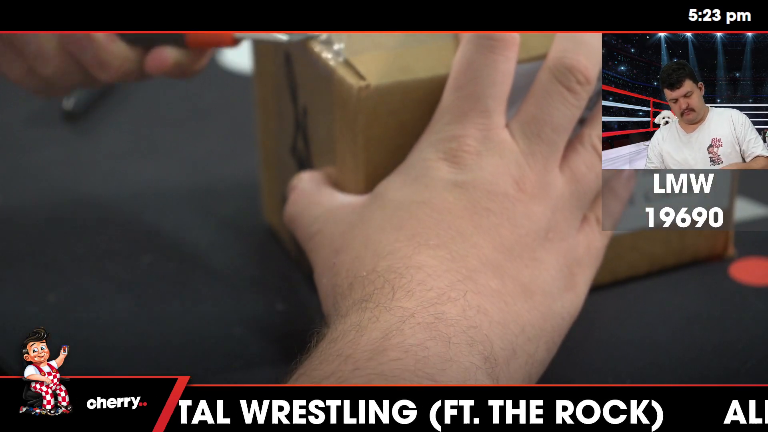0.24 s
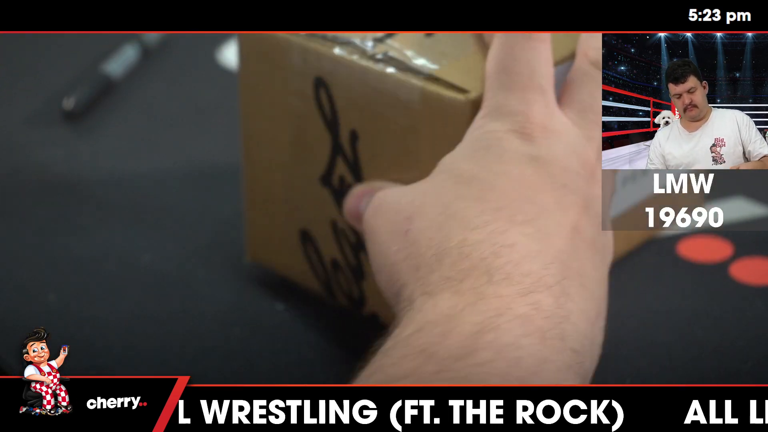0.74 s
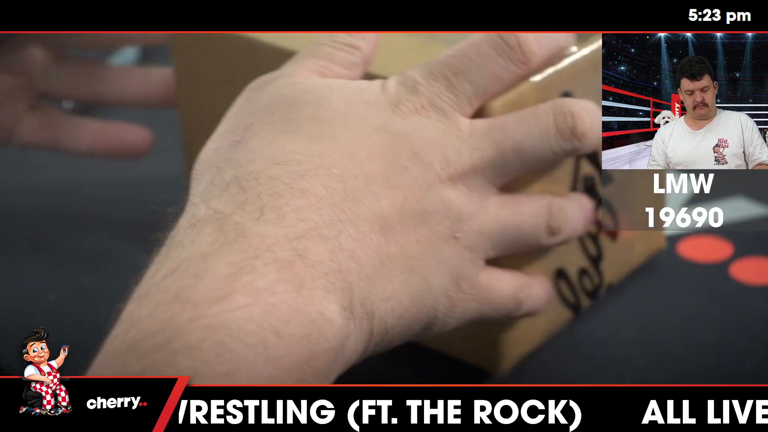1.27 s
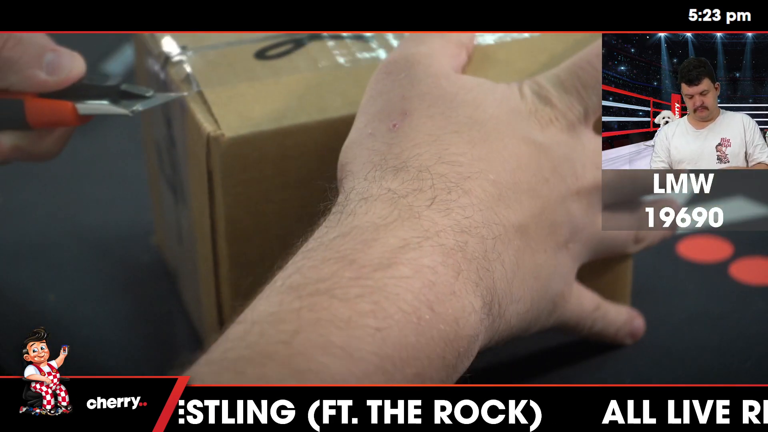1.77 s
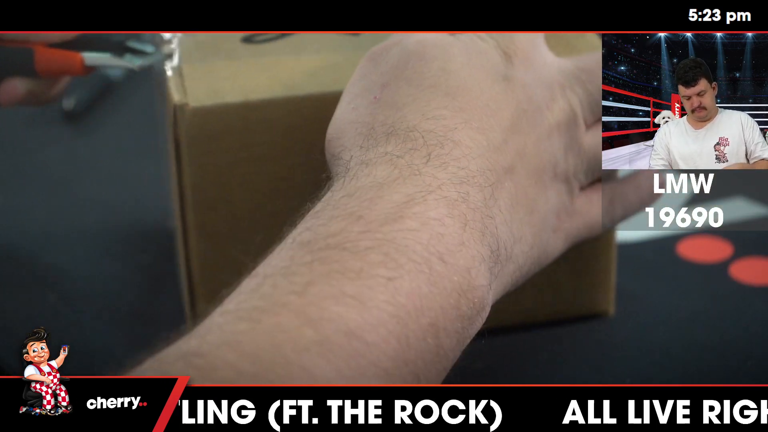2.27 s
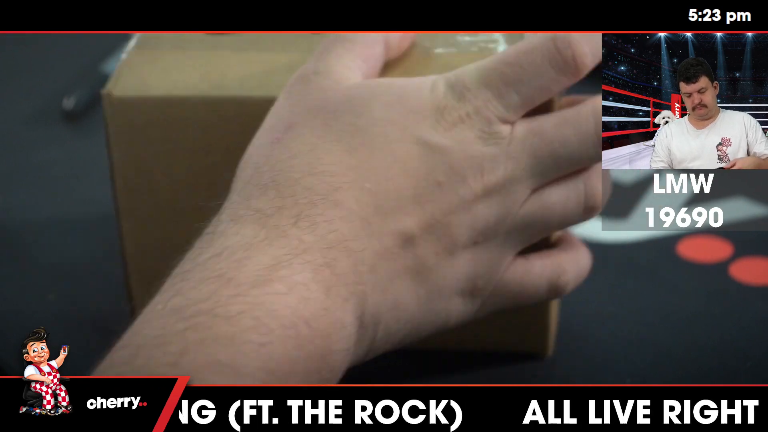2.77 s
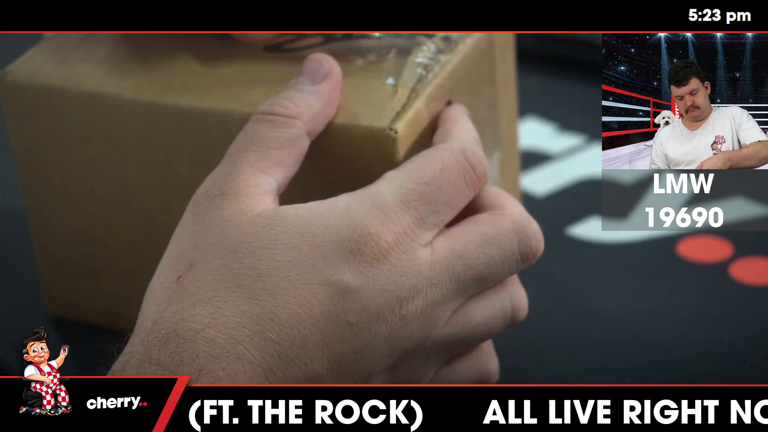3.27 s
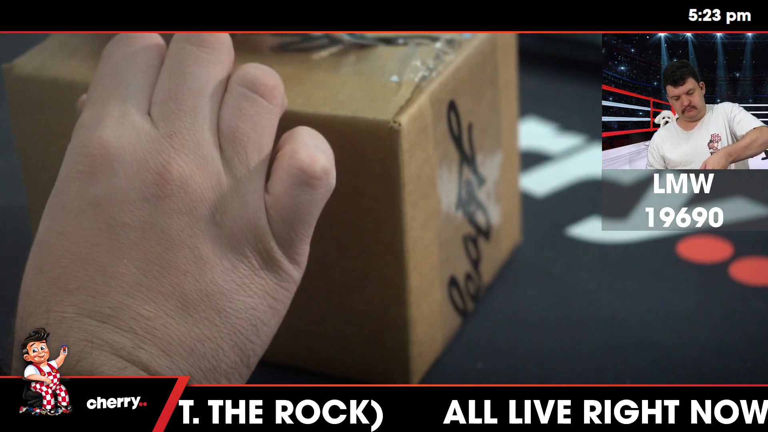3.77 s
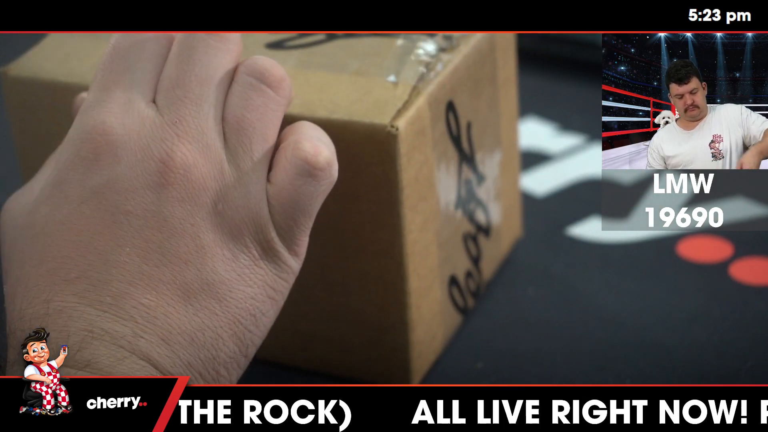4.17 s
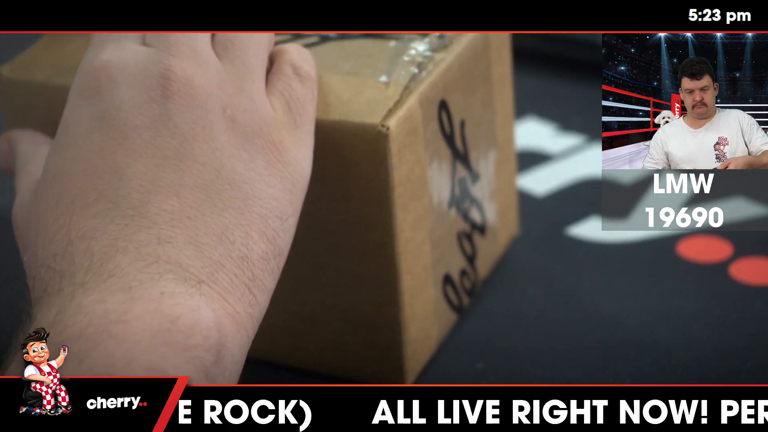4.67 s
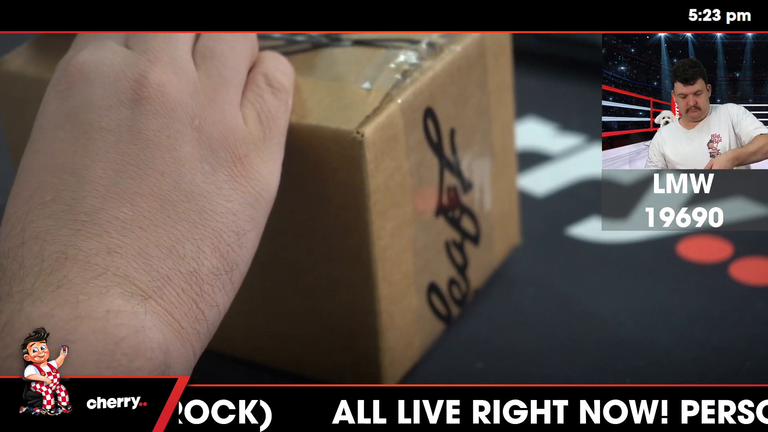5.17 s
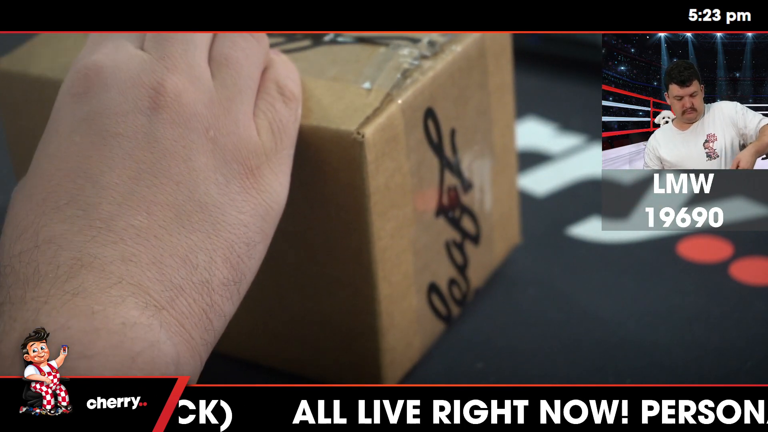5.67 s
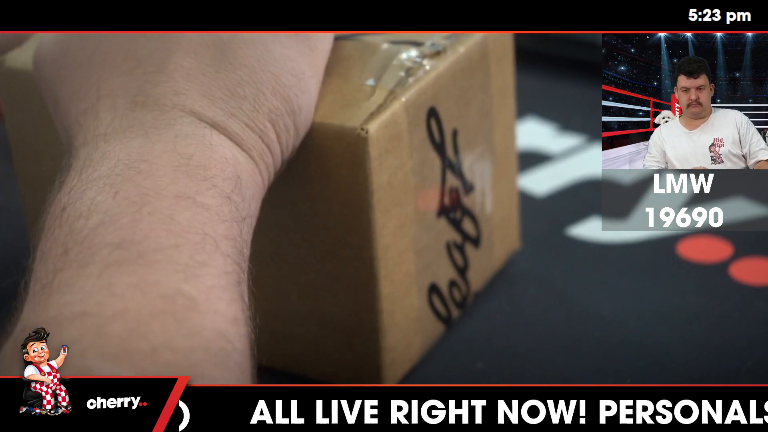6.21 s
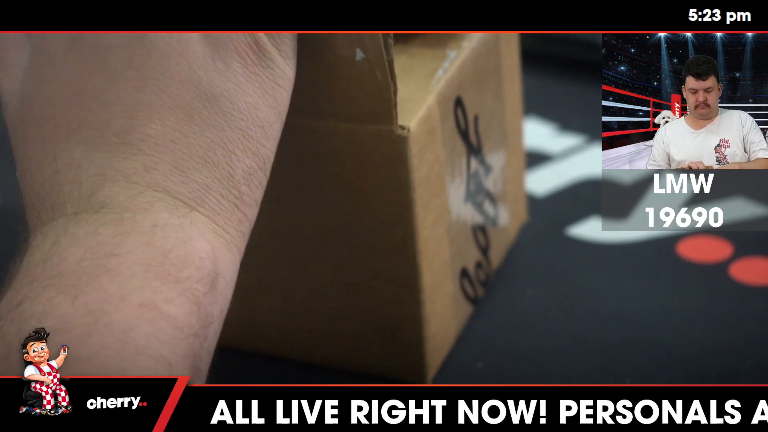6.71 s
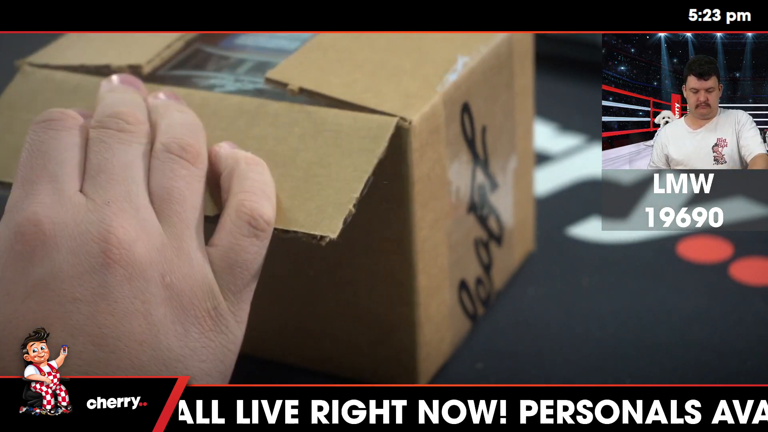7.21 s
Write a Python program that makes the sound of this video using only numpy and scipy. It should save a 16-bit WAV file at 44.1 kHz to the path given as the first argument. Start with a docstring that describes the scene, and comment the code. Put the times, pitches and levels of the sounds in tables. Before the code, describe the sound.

A soft low fan whir runs under close, mono handling sounds in a small room. At 0.1-0.2 s small snaps lead into a gritty blade rasp, brightest and slightly ringing at 0.3-0.5 s, then a crisp snap at 0.65. From 0.6 to 1.6 the box is turned: papery slides, ticks, crackles. Light clicks and rubbing around 2 s build to a short scratchy cut with sharp snaps at 2.3-2.4. Soft hissing slides fill 2.6-3.2. Hard snaps crack at 3.8 and 4.2 with hollow rumble, then it grows quiet, the whir sinking near 5. A strong snap at 5.3 brings short dull rasps to 5.7. Snaps at 5.9 lead to the loudest, bright crack at 6.2 and a cluster of pops and hollow thumps until 6.5. From 6.6 to the end, about 7.4, cardboard flaps rub, scrape and pop open.

```python
"""A utility knife slits the tape of a cardboard box on a cloth mat, close to a mono microphone in a small room.
A soft whir of fans runs throughout, sinking briefly near 5 s. First the blade rasps through in tiny tears, made
of random impulses, and the taut tape snaps in short noise bursts; unsteady pitched rings come with many snaps.
Between cuts the box is turned and hands slide over it: hissing noise with crackles. At the end the flaps are
pulled open, rubbing and popping. The hollow box rumbles under the hands."""
import sys
import numpy as np
from scipy import signal
from scipy.fft import rfft, irfft, next_fast_len
from scipy.io import wavfile
from scipy.ndimage import map_coordinates

SR = 44100
rng = np.random.default_rng(int(sys.argv[2]) if len(sys.argv) > 2 else 0)


def master_out(mix):
    """Clip the mix to full scale and print it as 16-bit PCM to the path in sys.argv[1]."""
    frames = np.transpose(np.atleast_2d(mix))
    ceiling = np.clip(frames, -1, 1)
    pcm = np.round(ceiling * 32767).astype(np.int16)
    wavfile.write(sys.argv[1], SR, pcm)


N = 328545

# The whir of the room. Each row: time in seconds, level in dB.
WHIR_LEVEL = [(0, -58), (.2, -58), (1.6, -60), (3.3, -58), (4.3, -64.5), (4.75, -64), (4.88, -73),
              (5.12, -72.5), (5.2, -57), (5.85, -63.5), (6.2, -61.5), (7.45, -57)]
# Colour of the whir. Each row: frequency in Hz, strength in dB.
WHIR_SPECTRUM = [(25, -20), (70, -6), (130, -1.5), (185, 4), (330, -1.5), (450, -3.5), (700, 1),
                 (1000, -2.5), (1400, -1), (1900, -15), (3000, -14), (7000, -17), (15000, -27)]
# Snaps of tape, blade and board. Each row: start in seconds, level in dB, brightness in dB per octave,
# level of the panel's knock in dB, decay time (to -60 dB) in seconds, before the extra of each band.
SNAPS = [(0.083, -45.5, -5, -51, 0.0057), (.144, -31, 3.5, -42.5, 0.01), (0.1602, -37.5, 12, -64, .01),
         (0.1984, -33.5, 0.5, -36.5, 0.011), (0.2044, -37, 2, -57, 0.0043), (0.5581, -41, -5, -58, .007),
         (0.654, -25.5, 9, -45, 0.013), (0.8785, -34, -4.5, -46, 0.0079), (1.0289, -42.5, -6.4, -45, 0.016),
         (1.1406, -43.5, 7, -55, 0.017), (1.1752, -38, -1, -51, 0.0087), (1.337, -37, 7, -55, 0.0062),
         (1.69, -56, -12.5, -49, .008), (1.873, -47, -1, -55, .015), (1.9138, -43, -0.5, -46, 0.0011),
         (1.9901, -40, 2.5, -50, 0.005), (2.0188, -41, -6.5, -44, .0034), (2.1136, -37, 2, -50, 0.0092),
         (2.1782, -37, 7, -42, 0.005), (2.197, -36.5, 7.5, -45, 0.003), (2.3143, -26, 2, -36.5, 0.0053),
         (2.3247, -36, 11, -58, 0.0037), (2.3812, -29.5, -2.5, -50, 0.0044), (4.5558, -49.5, 0, -55, .009),
         (5.1415, -59, 0, -61, 0.0077), (2.6366, -36, 0.5, -54, 0.0035), (3.1739, -57, -9, -50, .011),
         (3.5475, -46, 4.5, -51, 0.004), (3.622, -45.5, 9.5, -46, 0.042), (3.7308, -44.5, -0.5, -48, .014),
         (3.7739, -21.5, -0.2, -29.5, .007), (3.789, -36, 15, -63, .022), (4.176, -27.5, 0, -38, 0.015),
         (4.1832, -20.5, 7, -36, 0.0068), (4.784, -53, 3, -60, .012), (5.1772, -38, 3.5, -49, 0.022),
         (5.2907, -20, -1.4, -28, 0.013), (5.716, -30, 4, -55, 0.028), (5.8984, -42.5, 4, -59, 0.058),
         (5.937, -27.5, 6.5, -44, 0.012), (6.0773, -47, 11.5, -65, 0.0091),
         (6.1083, -41.5, -8.5, -39.5, 0.013), (6.148, -36.5, -5.5, -44, .006),
         (6.173, -38, -7, -44, 0.0054), (6.1847, -43.5, -11.5, -29.5, .011),
         (6.19, -15.5, 8.5, -31.5, 0.026), (6.2325, -34.5, 11.5, -61, .017),
         (6.2661, -26.5, 7, -47, 0.0083), (6.2756, -34.5, 1, -50, 0.012), (6.3359, -26.5, -0.7, -29, .014),
         (6.4091, -42, 7, -38.5, .009), (6.4865, -34.5, 1, -49, 0.012), (6.6693, -38.5, -6.5, -35, 0.018),
         (6.7772, -38.5, 0, -61, 0.025), (6.956, -36, 2, -65, 0.0063), (6.988, -37, -1.5, -43.5, 0.0041),
         (7.147, -31, 1, -47, .005), (7.195, -36.5, 7.5, -60, 0.0092), (7.2253, -30.5, 4, -48, 0.054),
         (7.231, -29.5, 5.5, -56, .02), (7.4295, -34.5, 2, -42, 0.023)]
# Pop, crack, tick and fizz of a snap. Each row: low edge in Hz, high edge in Hz, extra decay time in seconds,
# level in dB.
SNAP_BANDS = [(840, 2590, .0038, -8), (3000, 7380, 0.0021, 0), (6800, 11100, .0015, -11),
              (12000, 15000, .001, -28)]
# The panel's knock under a snap: low edge in Hz, high edge in Hz, extra decay time in seconds.
KNOCK_BAND = (117, 503, 0.033)
# A seam that faces away from the microphone sends more of its snap into the room.
# Each row: time in seconds, level of the room's answer in dB.
SEAM_FACING = [(.1, -9), (.65, -8.5), (2.3, -7), (3.77, -6), (4.18, -6.5), (5.29, -8.5), (5.94, -8),
               (6.2, -17), (6.34, -3), (7.2, -10)]
# How long the room rings. Each row: frequency in Hz, decay time (to -60 dB) in seconds.
ROOM_DECAY = [(150, 1), (400, 1), (1000, 0.51), (3000, 0.64), (7000, 0.24), (14000, 0.35)]
# Pushes of the hands on the hollow box. Each row: start in seconds, length in seconds, level in dB,
# hardest moment as a share of the length.
PUSHES = [(.14, 0.31, -52, 1), (1.24, 0.11, -55.5, .4), (2.315, 0.14, -44.5, 0.11), (3.6, 0.042, -53.5, .5),
          (3.83, 0.54, -53, 0.48), (4.53, 0.21, -60.5, 0.23), (5.57, 0.21, -56, .75),
          (6.11, 0.22, -46.5, 0.2), (6.335, 0.24, -48.5, 0.075), (6.67, 0.049, -58, 0.29),
          (6.95, 0.34, -58.5, 0.62)]
# Colour of the hollow box's rumble. Each row: frequency in Hz, strength in dB.
BOX_SPECTRUM = [(25, -20.5), (70, -9.5), (130, -0.5), (185, 3.5), (300, -0.5), (450, -10), (700, -6.5),
                (1400, -9.5), (3000, -22), (6000, -59)]
# Pulls of the blade through tape and board. Each row: start in seconds, length in seconds, level in dB,
# hardest moment as a share of the length, brightness in dB.
CUTS = [(.148, 0.048, -42.5, 0.27, -1.5), (.2, 0.092, -45.5, .9, 0), (.288, 0.036, -39.5, 0.31, 2),
        (.343, 0.058, -35, .7, 1.5), (.408, 0.074, -35.5, 0.22, 0.5), (2.15, .05, -43.5, .3, -5),
        (2.316, .11, -38.5, 0.43, 2), (2.345, 0.016, -34.5, 0.62, 0), (3.788, 0.073, -42.5, .2, -3),
        (3.88, 0.3, -57, .2, -3), (5.303, 0.09, -43.5, 0.074, -6.5), (5.563, 0.1, -44.5, .35, -6),
        (5.65, 0.067, -41, 0.97, 0.5), (5.92, 0.048, -51, 0.41, -3), (6.11, 0.26, -52.5, 0.23, -8)]
# Resonances of the blade. Each row: frequency in Hz, width in Hz, level in dB.
BLADE_MODES = [(900, 350, -1.5), (2450, 160, 3), (3950, 200, -11), (6070, 350, -1), (7490, 250, -7),
               (10150, 450, -4)]
# How freely the blade rings, most in the middle of the first cut. Each row: time in seconds, ring in dB.
BLADE_RING = [(.31, -0.5), (.37, 6.5), (.48, 4), (2.2, -18)]
# Colour of the rasp and the crackles. Each row: frequency in Hz, strength in dB.
RASP_SPECTRUM = [(120, -18), (250, -6), (480, -9.5), (900, -5.5), (1300, -8.5), (1750, -7.5), (2900, -6.5),
                 (4300, -2), (6000, -3), (8000, -6), (10400, -9.5), (13000, -17), (16000, -27)]
# Cardboard sliding on the mat, under the hands, flap on flap. Each row: start in seconds, length in seconds,
# level in dB, fastest moment as a share of the length, treble in dB.
SLIDES = [(.56, 0.38, -48.5, 0.46, 1), (.89, 0.062, -41, 0.99, 3.5), (1.145, 0.068, -46.5, 0.93, 6),
          (1.24, 0.052, -49.5, 0.37, 9.5), (1.303, 0.038, -42.5, 0.7, 1), (1.35, 0.19, -53, .1, -3),
          (1.57, .21, -53.5, .3, -4), (2.0, 0.36, -47, 0.59, -11), (2.585, .09, -53.5, 0.13, 4.5),
          (2.68, 0.45, -47, 0.17, 5), (3.3, 0.21, -57, 0.63, -8.5), (3.64, .16, -61, .5, 3.5),
          (4.06, 0.34, -58, .25, 4), (4.555, 0.09, -57, 0.84, 1), (4.71, 0.041, -64.5, .4, 5.5),
          (4.85, 0.15, -70.5, 0.35, 2), (5.185, .08, -53.5, 0.15, -6), (5.37, 0.16, -47.5, 0.47, 3),
          (5.87, 0.36, -54, 0.17, -13), (6.34, 0.13, -47.5, 0.13, -1), (6.62, 0.36, -46, 0.44, -4.5),
          (6.93, 0.16, -45.5, 0.17, -5), (7.05, 0.195, -45, 0.78, -5), (7.125, 0.073, -42.5, 0.53, -6.5),
          (7.26, 0.26, -47, 0.66, 0.5)]
# Colour of the sliding hiss. Each row: frequency in Hz, strength in dB.
HISS_SPECTRUM = [(200, -33), (900, -13.5), (1900, -10.5), (2700, -7), (3800, 0), (5600, 1), (8000, -1),
                 (11000, -6.5), (15500, -17)]
# Pitched twangs and rings, mostly with the snaps: most very short, a few lingering like the room's answer.
# Each row: start in seconds, pitch in Hz, level in dB, decay time (to -60 dB) in seconds,
# pitch unsteadiness as a share.
TWANGS = [(0.656, 7040, -18, 0.015, 0.1), (2.018, 2520, -22, 0.0096, 0.1), (2.337, 270, -32, .044, 0.027),
          (3.627, 170, -47, 0.085, .03), (3.7733, 6430, -13.5, 0.01, 0.098),
          (3.775, 1920, -17, 0.01, 0.059), (4.184, 3060, -37.5, 0.4, 0.0536),
          (4.184, 4080, -37, 0.31, 0.058), (4.184, 6030, -14, 0.013, .033),
          (5.2927, 1800, -15, .0095, 0.16), (5.585, 500, -46.5, 0.26, .14),
          (5.938, 2600, -23, 0.017, 0.088), (6.195, 6955, -21.5, 0.062, .007),
          (6.196, 3320, -39.5, 0.66, 0.09), (6.485, 850, -26, 0.017, .03),
          (6.775, 4380, -29.5, .022, 0.056), (6.989, 1586, -23.5, 0.019, 0.045),
          (7.154, 149, -33, .071, .03)]
# Shape of each kind of stroke: swell from ends to crest in dB, attack in seconds, release in seconds.
PUSH_SHAPE = (9.6, 0.0055, 0.13)
CUT_SHAPE = (6.2, 0.0014, 0.12)
SLIDE_SHAPE = (7.9, 0.0029, 0.22)

SNAP_ATTACK_S = .0007
SNAP_PIVOT_HZ = 4690  # brightness tips a snap about this frequency
SHAKE_DB = -20.5  # rumble that any sliding shakes out of the box, relative to the sliding strength
# Crackles of handled board: how many a second, and level over the sliding strength
CRACKLE_RATE, CRACKLE_DB = 16, 3.5
CRACKLE_SCATTER_DB, CRACKLE_T60_S = 4, .008
TOP_HZ = 16100  # nothing is heard above this


def amp(db):
    """Turn dB into a plain multiplier."""
    return 10 ** (np.asarray(db) / 20)


def unit(x):
    """Scale a sound to an average (rms) strength of 1."""
    return x / np.sqrt(np.mean(x ** 2) + 1e-20)


def along(points, hz):
    """Read a curve of (Hz, value) points on a log frequency axis."""
    f, v = np.transpose(points)
    return np.interp(np.log(hz + 1), np.log(f + 1), v)


def curves(rows):
    """One value per sample for each column after the time."""
    s, *columns = np.transpose(rows)
    return [np.interp(np.arange(N) / SR, s, column) for column in columns]


def wobble(rate):
    """A smooth random curve through the given number of random points a second."""
    points = rng.standard_normal(int(N * rate / SR) + 4)
    return map_coordinates(points, [np.arange(N) * rate / SR])


def filtered(x, response):
    """Multiply each frequency of x by a (possibly complex) response."""
    m = next_fast_len(N + SR // 2)
    spectrum = rfft(x, m) * response(np.fft.rfftfreq(m, 1 / SR))
    return irfft(spectrum, m)[..., :N]


def coloured(x, spectrum):
    """Shape x by a spectrum table and scale it to rms 1."""
    return unit(filtered(x, lambda hz: amp(along(spectrum, hz))))


def add(track, s, sound):
    """Mix a sound into the track at time s."""
    start = max(0, round(s * SR))
    track[start:start + len(sound)] += sound[:max(0, N - start)]


def grains(rate, spread_db):
    """Fibres letting go at random moments: mostly small impulses, a few large."""
    size = amp(spread_db * np.minimum(rng.standard_normal(N), 2))
    happens = rng.random(N) < rate / SR
    return unit(happens * size * np.sign(rng.standard_normal(N)))


def puff(envelope, lo, hi):
    """A band of noise under an envelope, with the energy of 2 ms at rms 1."""
    band_pass = signal.butter(3, [lo, hi], "band", fs=SR, output="sos")
    band = signal.sosfilt(band_pass, rng.standard_normal(len(envelope)) * envelope)
    return band / np.sqrt(np.sum(band ** 2) / (.002 * SR))


def strokes(rows, shape):
    """Strength of hand strokes: each takes hold, swells to its crest, eases off and lets go."""
    swell_db, attack_s, release_s = shape
    gain = np.zeros(N)
    for s, length, db, crest, *_ in rows:
        t = np.arange(round((length + 2 * release_s) * SR)) / SR
        crest_s = length * np.clip(crest, .05, .95)
        off_crest = np.interp(t, [0, crest_s, length], [1, 0, 1])
        take_hold = 1 - np.exp(-t / attack_s)
        let_go = amp(-60 * np.maximum(t - length, 0) / release_s)
        add(gain, s, amp(db - swell_db * off_crest ** 2) * take_hold * let_go)
    return gain


def colour_of(rows):
    """The last column of a stroke table, gliding from one stroke to the next."""
    return curves([(s + length / 2, colour) for s, length, _, _, colour in rows])[0]


def whir():
    """Fans in the room: a soft noise, mostly below 1.5 kHz."""
    level_db, = curves(WHIR_LEVEL)
    return amp(level_db) * coloured(rng.standard_normal(N), WHIR_SPECTRUM)


def snaps(wall_db):
    """Each snap is a burst of a few milliseconds; its low part lingers in the panels, and the room answers."""
    direct, answer = np.zeros(N), np.zeros(N)
    t = np.arange(SR * 3 // 4) / SR
    for s, level_db, brightness, knock_db, t60 in SNAPS:
        answer_db = np.interp(s, *np.transpose(SEAM_FACING))
        parts = [(*KNOCK_BAND, knock_db)]
        for lo, hi, linger, band_db in SNAP_BANDS:
            octaves = np.log2(np.sqrt(lo * hi) / SNAP_PIVOT_HZ)
            parts.append((lo, hi, linger, level_db + band_db + brightness * octaves))
        for lo, hi, linger, db in parts:
            burst = amp(-60 * t / (t60 + linger)) * (1 - np.exp(-t / SNAP_ATTACK_S))
            room_t60 = along(ROOM_DECAY, np.sqrt(lo * hi))
            tail = amp(-60 * t / room_t60) * (1 - np.exp(-t / 0.0068))
            add(direct, s, amp(db) * puff(burst, lo, hi))
            add(answer, s, amp(db + answer_db) * puff(tail, lo, hi))
    # one near wall echoes 15.5 ms later
    wall = filtered(direct, lambda hz: np.exp(-2j * np.pi * hz * .0155))
    return direct + answer + amp(wall_db) * wall


def box(slide):
    """The walls and the air inside rumble as the hands push and drag."""
    force = np.hypot(strokes(PUSHES, PUSH_SHAPE), amp(SHAKE_DB) * slide)
    rumble = coloured(grains(rate=1500, spread_db=2.5), BOX_SPECTRUM)
    return force * amp(3.07 * wobble(30)) * rumble


def room(x, stretch_count=20):
    """A spread-out tail, longer or shorter by frequency; each equal stretch of time gets a new one."""
    out = np.zeros(N)
    for part in np.array_split(np.arange(N), stretch_count):
        hz, t, noise = signal.stft(rng.standard_normal(SR), SR, nperseg=256)
        decay = amp(-60 * t / along(ROOM_DECAY, hz)[:, None])
        tail = signal.istft(noise * decay, SR, nperseg=256)[1]
        tail *= 1 - np.exp(-np.arange(len(tail)) / SR / 0.0024)  # soft start
        add(out, part[0] / SR, signal.fftconvolve(x[part], tail / np.linalg.norm(tail)))
    return out


def blade_response(hz):
    """The blade's resonances: each is strongest at its own frequency."""
    return sum(amp(db) * 1j * hz * width / (centre * centre - hz * hz + 1j * hz * width)
               for centre, width, db in BLADE_MODES)


def cutting():
    """The blade sticks and slips; each clump of tiny tears rings the blade and the taut tape."""
    pull, brightness_db = strokes(CUTS, CUT_SHAPE), colour_of(CUTS)
    ring_db, = curves(BLADE_RING)
    clumps = amp(2.2 * wobble(130) + 1.8 * wobble(600))
    tears = grains(rate=6500, spread_db=4.3) * clumps
    ringing = amp(ring_db) * filtered(tears, blade_response)
    rasp = coloured(0.92 * tears + ringing, RASP_SPECTRUM)
    # tape tears bright, board tears dull: the balance tips about 4.8 kHz
    dull = filtered(rasp, lambda hz: 1 / (1 + (hz / 4800) ** 4))
    bright = rasp - dull
    return pull * (dull * amp(-brightness_db) + bright * amp(brightness_db))


def rubbing(slide):
    """Sliding paper fibres give a dense, fine hiss with small catches in it."""
    catches = grains(rate=900, spread_db=5)
    hiss = coloured(rng.standard_normal(N) + 0.59 * catches, HISS_SPECTRUM)
    treble = filtered(hiss, lambda hz: 1 - 1 / (1 + (hz / 9000) ** 4))
    treble_change = (amp(colour_of(SLIDES)) - 1) * treble
    return slide * amp(1.6 * wobble(45)) * (hiss + treble_change)


def crackles(slide):
    """Small random snaps of handled board whose strength follows the sliding."""
    moments = rng.random(N) < CRACKLE_RATE / SR
    scatter_db = CRACKLE_SCATTER_DB * np.clip(rng.standard_normal(N), -2, 2)
    sizes = moments * slide * amp(CRACKLE_DB + scatter_db)
    t = np.arange(SR // 20) / SR
    bursts = signal.fftconvolve(sizes, amp(-60 * t / CRACKLE_T60_S))[:N]
    return bursts * coloured(rng.standard_normal(N), RASP_SPECTRUM)


def twangs():
    """Fading tones at unsteady pitches, mostly with the snaps: most very short, a few lingering."""
    out, t = np.zeros(N), np.arange(SR // 2) / SR
    for s, hz, db, t60, unsteady in TWANGS:
        pitch_hz = hz * (1 + unsteady * wobble(900)[:len(t)])
        phase = 2 * np.pi * np.cumsum(pitch_hz) / SR
        envelope = amp(db - 60 * t / t60) * (1 - np.exp(-t / 0.00065))
        add(out, s, envelope * np.sin(phase))
    return out


def scene():
    """The whir and all handling sounds in the room, the same in both channels."""
    slide = strokes(SLIDES, SLIDE_SHAPE)
    friction = box(slide) + cutting() + rubbing(slide) + crackles(slide)
    rings = twangs()
    reverberation = room(amp(-10.5) * friction + amp(-14) * rings)
    mono = whir() + snaps(wall_db=-26.5) + friction + rings + reverberation
    return np.array([mono, mono])


def record(dry):
    """The microphone's lopsided response pushes the baseline down under loud sounds; then the band limit."""
    sag = filtered(np.abs(dry), lambda hz: 1 / (1 + 1j * hz / 45))  # follows loudness slowly
    return filtered(dry - 0.41 * sag, lambda hz: hz < TOP_HZ)


dry = scene()
out = record(dry)
master_out(out)
```